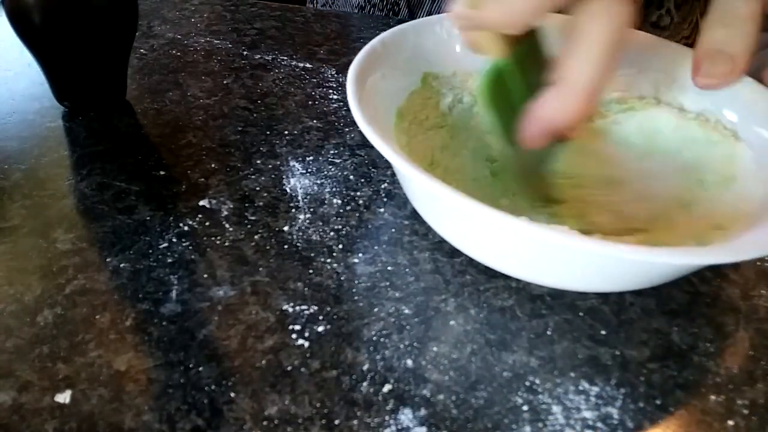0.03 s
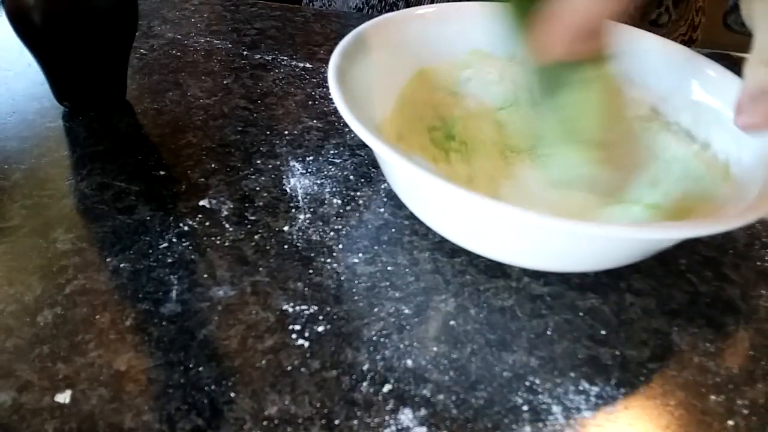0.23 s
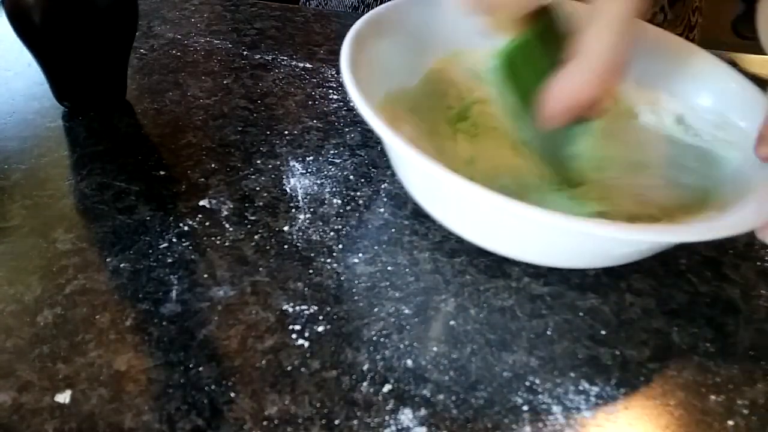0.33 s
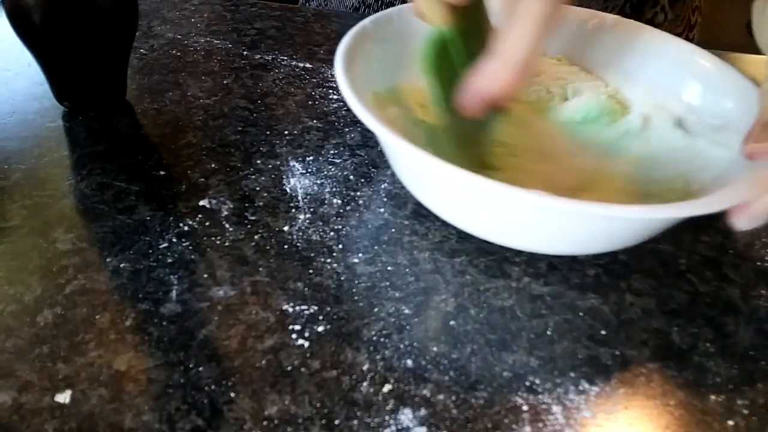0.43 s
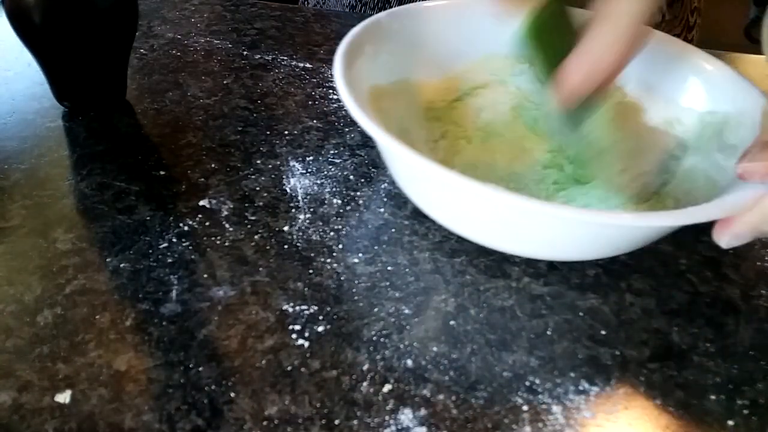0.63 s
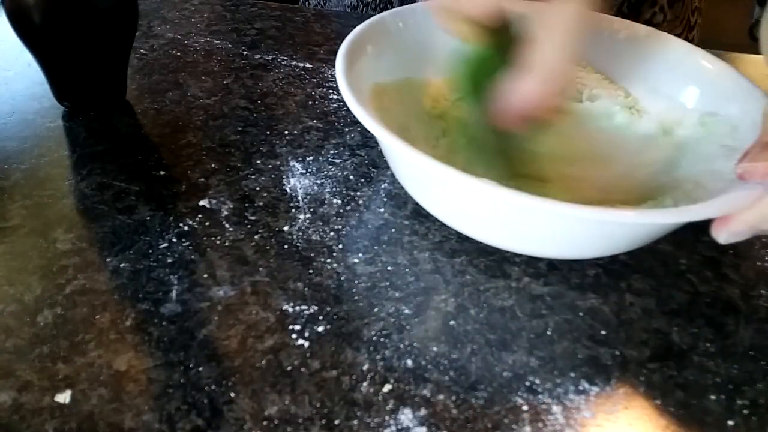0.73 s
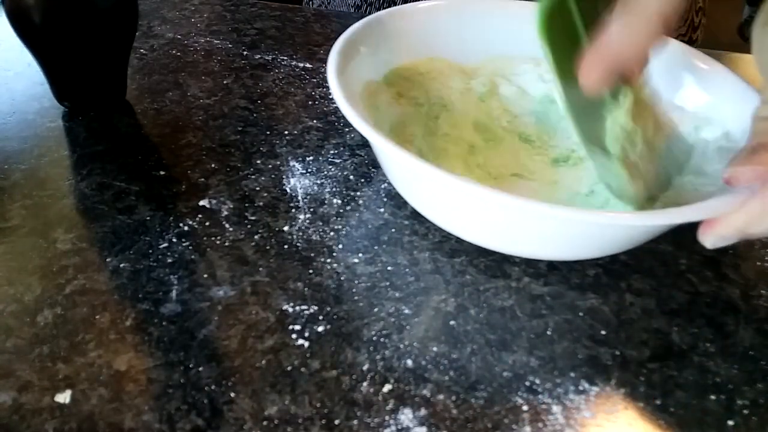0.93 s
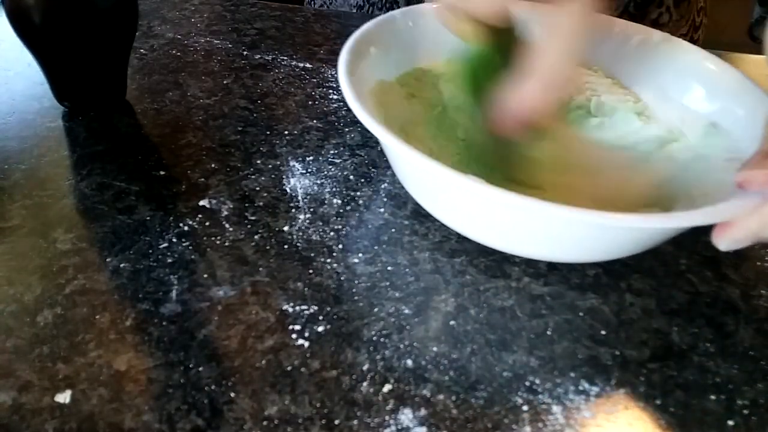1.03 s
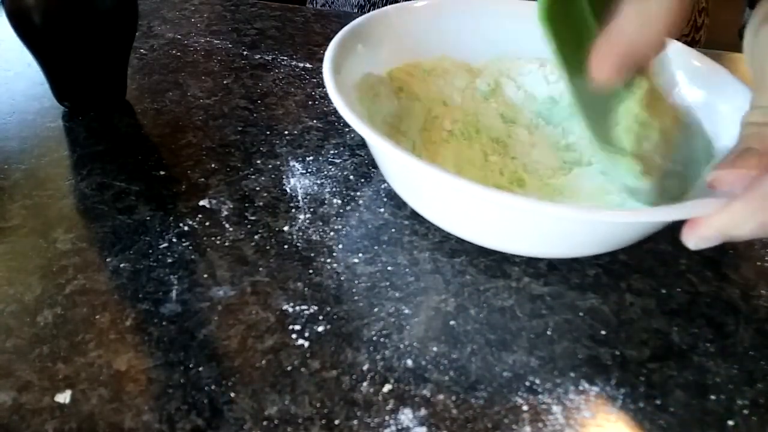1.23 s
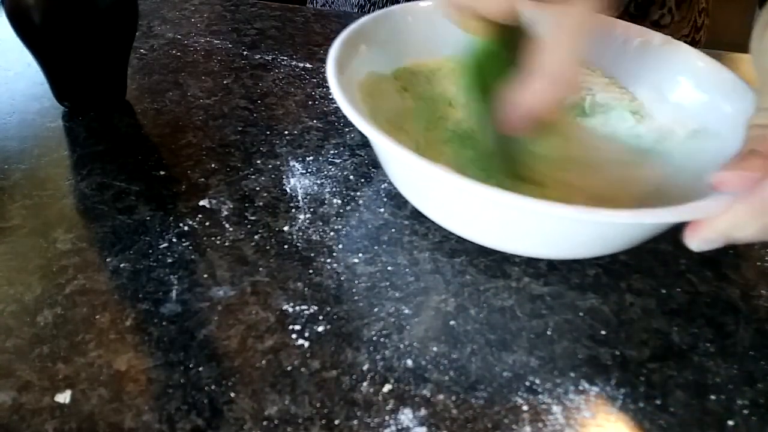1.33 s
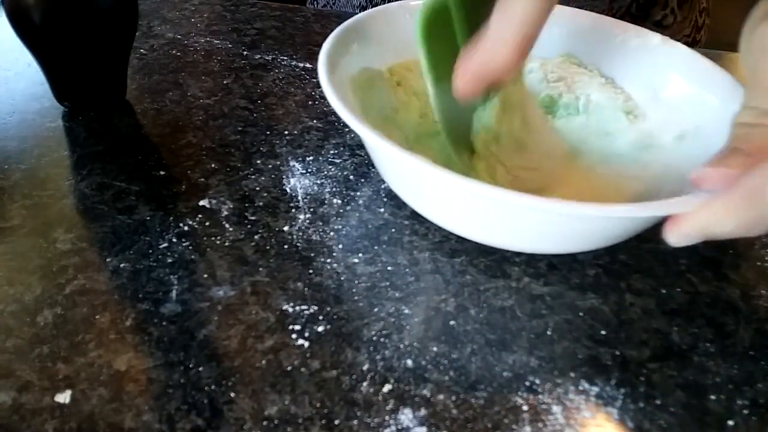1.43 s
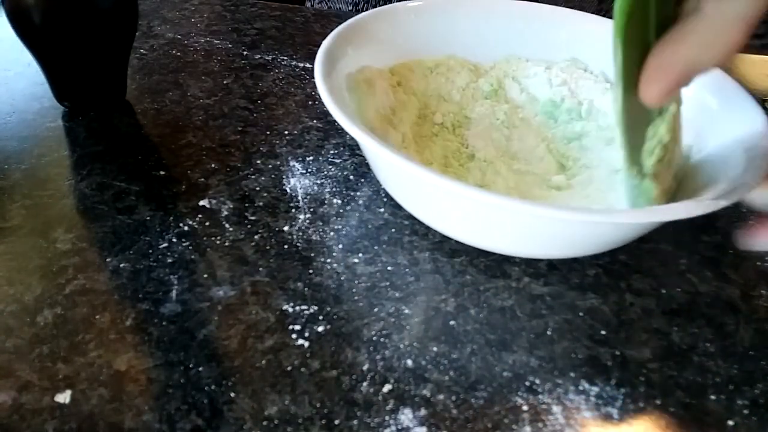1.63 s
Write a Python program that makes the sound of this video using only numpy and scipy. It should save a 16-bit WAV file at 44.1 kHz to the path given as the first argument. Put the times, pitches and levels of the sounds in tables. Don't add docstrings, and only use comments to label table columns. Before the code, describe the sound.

A soft spatula stirs damp gritty powder in a thick ceramic bowl, scraping, tapping and knocking

```python
import sys
import numpy as np
from scipy import signal
from scipy.fft import rfft, irfft
from scipy.io import wavfile

SR = 44100
rng = np.random.default_rng(int(sys.argv[2]) if len(sys.argv) > 2 else 0)


def put_to_file(sound):
    columns = np.atleast_2d(sound).T
    safe = np.clip(columns, -1, 1)
    whole_steps = np.round(safe * 32767)
    wavfile.write(sys.argv[1], SR, whole_steps.astype(np.int16))


def gain_from_decibels(decibels):
    exponent = np.asarray(decibels, float) / 20
    return 10 ** exponent


N = 74970

# peak time in seconds, grit level in dB,
# wall share in dB, width in seconds, brightness in dB.
CRUNCHES = [(.095, -58.5, 4, 0.0059, 27.5), (0.178, -47, 8, 0.014, 3), (.195, -39, 1.5, 0.0052, 0),
            (.219, -36.5, 12, 0.007, -10), (0.23, -31.5, 6, 0.0066, -21.5), (0.242, -39, 4.5, 0.0055, -15),
            (0.439, -45.5, 17.5, 0.015, 18.5), (0.449, -33.5, -6, 0.0045, -2), (0.516, -31, 0.5, 0.0042, 4),
            (0.532, -26, -8, 0.0071, 5), (.711, -58.5, 19, 0.005, 11), (0.843, -66.5, 26.5, 0.0079, -8),
            (1.079, -41, 9.5, 0.0095, -1), (1.088, -52, 1, 0.0017, 19), (1.114, -44, 3, 0.003, 3),
            (1.134, -59.5, 10, 0.0044, -7), (1.378, -46, 10, 0.0079, 12), (1.394, -35, 3.5, 0.0048, 7),
            (1.416, -41.5, 5, 0.0082, -1), (1.682, -50, 10.5, 0.014, 12)]
# start in seconds, grit peak in dB,
# wall share in dB, fade in seconds, brightness in dB.
TICKS = [(.205, -22.5, -11, 0.0047, -13), (.431, -27, -0.5, 0.0029, -8), (0.5308, -20.5, 0.5, .002, -4),
         (0.7852, -29, -2, 0.0085, -1), (0.96, -44, -12, 0.0064, 1), (1.0838, -33.5, -10, 0.004, 8),
         (1.097, -53, -9, .002, 10), (0.2294, -33, -15, 0.0027, -10), (.5132, -28, -17, .004, 5),
         (1.1129, -29, -17, 0.003, -5), (1.3901, -28, -10, 0.0026, -14), (1.3922, -40, -9, 0.0029, 4),
         (1.4125, -32, -12, .005, 3), (1.6774, -40, -4, 0.0045, 4), (0.3945, -40.5, -21, .003, 8)]
# pitch in Hz, level in dB, time to fade by 60 dB in seconds.
COUNTER_MODES = [(71, -6, 0.13), (82.16, -5, 0.35), (100, -3.5, 0.093), (138.6, -8, 0.1), (185, -1, 0.076),
                 (228, 4.5, 0.026), (277, -11, 0.26), (348, -20.5, 0.14)]
# pitch in Hz, level in dB,
# time to fade by 60 dB in seconds.
BOWL_MODES = [(381, -13, 0.06), (538, -0.5, 0.16), (567.3, 2, 0.063), (608.5, 0, 0.045), (687, 0.5, 0.035),
              (746.6, -0.5, 0.044), (803.5, -12.5, 0.091), (787, -18, 0.061), (830, -42, .04),
              (1390, -18, 0.05), (1733, -17, 0.11), (1826, -12, 0.017), (2530, -10.5, 0.01),
              (3340, -43, .04)]


def rms_one(x):
    return x / np.sqrt(np.mean(x ** 2) + 1e-20)


def colour(x, points):
    hz = np.fft.rfftfreq(N, 1 / SR) + 1
    at, db = np.transpose(points)
    return irfft(rfft(x) * gain_from_decibels(np.interp(np.log(hz), np.log(at), db)), N)


def drift(rate_hz):
    r = np.exp(-2 * np.pi * rate_hz / SR)
    wander = signal.lfilter([1], [1, -2 * r, r * r], rng.standard_normal(N + SR))
    return rms_one(wander[SR:])


def clicks(per_second, spread_db):
    size = gain_from_decibels(spread_db * np.minimum(rng.exponential(1, N), 4)) * rng.choice([-1, 1], N)
    return rms_one(size * (rng.random(N) < per_second / SR))


def ring(x, modes):
    out = 0
    for hz, db, t60 in modes:
        r, w = gain_from_decibels(-60 / (t60 * SR)), 2 * np.pi * hz / SR
        out = out + signal.lfilter([0, gain_from_decibels(db) * np.sin(w)], [1, -2 * r * np.cos(w), r * r], x + 1e-18)
    return out


def peak(x, hz, width_hz, db):
    a, w = gain_from_decibels(db / 2), 2 * np.pi * hz / SR
    k = np.tan(np.pi * width_hz / SR)
    middle = -2 * np.cos(w)
    return signal.lfilter([1 + k * a, middle, 1 - k * a], [1 + k / a, middle, 1 - k / a], x)


def high_pass(x, order, hz):
    return signal.sosfilt(signal.butter(order, hz, "high", fs=SR, output="sos"), x)


def band_pass(x, order, edges_hz):
    return signal.sosfilt(signal.butter(order, edges_hz, "band", fs=SR, output="sos"), x)


def hush():
    # pitch in Hz, level in dB.
    air_colour = [(24, -55), (40, -12), (109, 4), (230, -28), (520, 3.5), (990, -25), (5180, -24),
                  (9220, -36), (16000, -22)]
    level_db = -59
    air = colour(rng.standard_normal((2, N)), air_colour)
    return gain_from_decibels(level_db - 8.0) * air / np.std(high_pass(air, 4, 1000))


def efforts():
    # time in seconds, wall rumble in dB, rocking on the counter in dB.
    stroke = [(0, -57, -49), (.12, -48, -53.5), (.2, -35, -53), (0.332, -40, -45.5), (.4, -47.5, -46),
              (.5, -41.5, -48.5), (.6, -39.5, -33), (.69, -47, -48), (.8, -46.5, -48), (0.872, -43, -41),
              (0.949, -52.5, -60), (1.047, -79, -59), (1.098, -47, -38), (1.198, -43, -55.5),
              (1.3, -58.5, -64), (1.365, -62.5, -52), (1.478, -40, -49.5), (1.641, -59.5, -55.5)]
    # fastest moment in seconds, grit level in dB,
    # rise in seconds, fall in seconds, brightness in dB.
    sweeps = [(.06, -63, 0.2, 0.13, 10.5), (.15, -54, 0.049, 0.017, 6.5), (.34, -63, 0.064, 0.21, 19),
              (.66, -57, 0.14, 0.03, -12), (1.599, -61.5, 0.022, 0.17, 2), (0.214, -42.5, 0.037, 0.031, -1),
              (.265, -58, 0.048, 0.026, -20), (0.442, -44, 0.033, 0.04, 0),
              (0.556, -39.5, 0.042, 0.047, -6), (0.747, -50, 0.024, 0.033, 8.5),
              (0.873, -43.5, 0.038, 0.059, 3), (1.092, -45, 0.02, 0.047, -1),
              (1.195, -44.5, 0.039, .045, 2), (1.40, -50, 0.025, 0.065, 0), (1.498, -46.5, 0.032, .06, 0.5),
              (1.68, -52.5, .003, 0.083, 19)]
    tick_db = -9
    t = np.arange(N) / SR
    at, wall_db, rock_db = np.transpose(stroke)
    wall = gain_from_decibels(np.interp(t, at, wall_db)) ** 2
    rock = gain_from_decibels(np.interp(t, at, rock_db)) ** 2
    moves = []
    for s, db, rise, fall, tilt_db in sweeps:
        swell = np.exp(-((t - s) / np.where(t < s, rise, fall)) ** 2)
        moves.append((gain_from_decibels(db) * swell, tilt_db))
    for s, db, _, width, tilt_db in CRUNCHES:
        moves.append((gain_from_decibels(db) * np.exp(-((t - s) / width) ** 2), tilt_db))
    for s, db, _, fade, tilt_db in TICKS:
        moves.append((gain_from_decibels(db + tick_db) * (t > s) * np.exp(-np.abs(t - s) / fade), tilt_db))
    dull = sum((gain * gain_from_decibels(-tilt_db / 2)) ** 2 for gain, tilt_db in moves)
    bright = sum((gain * gain_from_decibels(tilt_db / 2)) ** 2 for gain, tilt_db in moves)
    return np.sqrt([dull, bright, wall, rock])


def grit(dull, bright):
    # pitch in Hz, level in dB.
    grain_colour = [(300, 2), (1000, 1.5), (2000, 0), (3200, -1.5), (4500, -3), (7000, -5.5), (11000, -9),
                    (16000, -12)]
    grains_per_s, grain_spread_db, patch_db = 4200, 6.5, 1.16
    band_edges_hz = [200, 1200, 2300, 3200, 4400, 5800, 7000, 8500, 11500, 17000]
    fineness = [.2, 0.053, .01, 0.35, 0.39, 0.83, 0.77, 1.0, 1.0]
    out = 0
    for low, high, fine in zip(band_edges_hz, band_edges_hz[1:], fineness):
        grains = colour(clicks(grains_per_s, grain_spread_db), grain_colour)
        patches = gain_from_decibels(patch_db * (drift(33.5) + drift(24)))
        band = band_pass(grains, 2, (low, high)) * patches
        out = out + band * dull ** (1 - fine) * bright ** fine
    return out


def rubbed(gain, modes):
    slips_per_s, slip_spread_db, slip_wander_db, contact_wander_db = 1500, 0.5, 2.5, 4
    slips = clicks(slips_per_s, slip_spread_db) * gain_from_decibels(slip_wander_db * drift(34))
    out = 0
    for mode in modes:
        contact = gain_from_decibels(contact_wander_db * np.clip(drift(13.9), -2, 2))
        out = out + ring(gain * slips * contact, [mode])
    return out / np.std(ring(slips, modes)) * gain_from_decibels(-2)


def jolts():
    jolt_db, jolt_hz, chatter_hz, chatter_jitter = 3, 1183, 638, 0.14
    push, bump = np.zeros(N), np.hanning(int(SR / jolt_hz) + 2)
    jitter = rng.normal(0, chatter_jitter, (len(CRUNCHES), 11))
    steps = (jitter + np.arange(-5, 6)) / chatter_hz
    for (s, db, wall_db, width, _), late in zip(CRUNCHES, steps):
        strength = np.exp(-(late / (0.63 * width)) ** 2)
        push[((s + late) * SR).astype(int)] += gain_from_decibels(db + wall_db + jolt_db) * strength
    for s, db, wall_db, *_ in TICKS:
        push[int(s * SR)] += gain_from_decibels(db + wall_db + 0.5)
    return ring(np.convolve(push, bump / bump.sum())[:N], BOWL_MODES) / 3


def knocks():
    # start in seconds, peak in dB, contact sharpness in Hz, share of the deep boom in dB.
    knock_rows = [(0.099, -43.5, 154, 17.5), (0.224, -25, 410, -23), (0.392, -28, 443, -25),
                  (0.402, -34, 295, -19), (0.5308, -11, 470, 7.5), (0.539, -10, 185, -11),
                  (0.577, -24, 192, -13), (.635, -40, 148, 23.5), (.735, -25, 328, 0),
                  (0.7453, -26.5, 328, 4.5), (1.074, -29.5, 405, 5), (1.19, -34.5, 200, 5),
                  (1.372, -27.5, 308, 10.5), (1.4027, -22.5, 262, 2), (1.4076, -21.5, 493, 7),
                  (1.504, -29, 204, 8.5), (1.678, -28, 377, 7.5)]
    deep_hz, wall_db = 110, -2
    push, deep = np.zeros(N), np.zeros(N)
    for s, db, hz, deep_db in knock_rows:
        bump = np.hanning(int(SR / hz) + 2)
        bump = bump / bump.sum()
        i = int(s * SR)
        push[i:i + len(bump)] += bump * gain_from_decibels(db - 6.5)
        deep[i:i + len(bump)] += bump * gain_from_decibels(db - 12 + deep_db)
    boom = ring(deep, [m for m in COUNTER_MODES if m[0] < deep_hz])
    thud = ring(push, [m for m in COUNTER_MODES if m[0] > deep_hz])
    return boom + thud + gain_from_decibels(wall_db) * ring(push, BOWL_MODES)


def raps():
    # start in seconds, peak in dB, pitch in Hz, time to fade by 60 dB in seconds.
    rap_rows = [(.176, -37, 516, .03), (.1955, -25, 714, 0.023), (0.2054, -25, 592, 0.041),
                (.2215, -19.5, 601, 0.031), (0.2299, -17.5, 640, 0.024), (.299, -28.5, 570, 0.036),
                (.356, -36.5, 545, 0.048), (.3935, -39.5, 614, 0.028), (.433, -31, 616, 0.036),
                (.5135, -23, 680, .03), (.5312, -16.5, 830, 0.021), (0.5331, -8, 635, 0.015),
                (.557, -30.5, 514, 0.036), (.837, -36, 550, .03), (.851, -34.5, 648, 0.044),
                (1.0755, -26, 630, 0.018), (1.0795, -20.5, 722, 0.02), (1.111, -27.5, 600, 0.03),
                (1.133, -32, 540, 0.049), (1.152, -34, 544, 0.04), (1.389, -31, 760, 0.022),
                (1.4097, -22, 560, .014), (.936, -42.5, 565, .05), (1.0722, -30, 694, 0.0081),
                (0.2246, -28, 577, 0.047), (1.502, -33.5, 562, 0.068), (1.52, -36.5, 550, 0.036),
                (1.677, -28.5, 583, 0.0093), (1.686, -33, 645, 0.047)]
    # multiple of the pitch, level in dB.
    overtones = [(1.3, -7), (2.1, -16)]
    out = np.zeros(N)
    for s, db, hz, t60 in rap_rows:
        push = np.zeros(SR // 8)
        push[:9] = np.hanning(9) / 4
        tones = [(hz, db, t60)]
        tones += [(hz * k, db + over_db, t60 / k) for k, over_db in overtones]
        note = ring(push, tones)
        i = int(s * SR)
        out[i:i + len(note)] += note[:N - i]
    return out


def cracks():
    crack_db, low_hz = 9, 900
    s, db = np.transpose(TICKS)[:2]
    push = np.zeros(N)
    push[(s * SR).astype(int)] = gain_from_decibels(db + crack_db)
    return high_pass(push, 2, low_hz)


def squeaks():
    # peak time in seconds, level in dB, pitch in Hz, width in seconds.
    squeak_rows = [(.208, -41, 2800, 0.0033), (0.255, -51, 2700, 0.0096), (.264, -49, 2500, 0.0045),
                   (0.289, -54.5, 2640, 0.011), (.535, -38, 1800, 0.0065), (1.086, -48, 8000, 0.0033),
                   (1.084, -45.5, 10960, 0.0081), (1.099, -47, 11100, 0.0025), (1.392, -33, 6530, 0.0048),
                   (1.393, -37.5, 10740, 0.0043), (1.6, -46.5, 1510, 0.0041), (1.113, -50, 1390, 0.0033),
                   (1.415, -42.5, 3730, 0.0034), (.865, -53.5, 2700, .012), (1.414, -44, 6600, 0.0024),
                   (1.69, -50, 1470, .01)]
    cycles = 24
    t, rub = np.arange(N) / SR, rng.standard_normal(N)
    out = 0
    for s, db, hz, width in squeak_rows:
        tone = rms_one(ring(rub, [(hz, 0, cycles / hz)]))
        out = out + gain_from_decibels(db) * np.exp(-((t - s) / width) ** 2) * tone
    return out


def space(x, near_db):
    right_lag_s, near_fade_s, near_low_hz = .00002, 0.0011, 638
    room_t60_s, room_db, room_band_hz = 0.43, -12.5, [350, 15000]
    t = np.arange(SR // 2) / SR
    near = rng.standard_normal((2, len(t))) * np.exp(-t / near_fade_s)
    near = high_pass(near, 2, near_low_hz)
    tail = rng.standard_normal((2, len(t))) * gain_from_decibels(-60 * t / room_t60_s) * (t > .006)
    tail = band_pass(tail, 1, room_band_hz)
    reply = 0
    for db, echo in [(near_db, near), (room_db, tail)]:
        reply = reply + gain_from_decibels(db) * echo / np.sqrt(np.sum(echo ** 2, axis=1, keepdims=True))
    direct = np.array([x, np.interp(np.arange(N) - right_lag_s * SR, np.arange(N), x)])
    return direct + signal.fftconvolve(x[None], reply, axes=1)[:, :N]


def scene():
    spots, grit_echo_db, body_echo_db, wall_rub_db = 3, 3.5, -4.5, 2
    dull, bright, on_wall, on_counter = efforts()
    powder = sum(space(grit(dull, bright), grit_echo_db) for _ in range(spots)) / np.sqrt(spots)
    rub = gain_from_decibels(wall_rub_db) * rubbed(on_wall, BOWL_MODES) + rubbed(on_counter, COUNTER_MODES)
    body = space(rub + jolts() + knocks() + raps(), body_echo_db)
    glaze = space(cracks(), grit_echo_db) + space(squeaks(), grit_echo_db)
    return hush() + powder + body + glaze


def roll_off(x):
    return signal.sosfilt(signal.butter(12, 16660, fs=SR, output="sos"), x)


def record(dry):
    # pitch in Hz, width in Hz, level in dB.
    left_port = [(443, 86, -5), (7600, 1940, 8.5), (6070, 330, 5.5), (9480, 710, -18.5), (12750, 6700, -8)]
    right_port = [(435, 52, -11), (6800, 850, -1.5), (6610, 86, 6), (9100, 460, -3), (10280, 660, 6),
                  (11950, 5700, 1.5)]
    turn_hz, turn_width_hz = 4310, 2570
    low_cut_hz, top_hz = 52.2, 16050
    ports = []
    for x, port in zip(dry, [left_port, right_port]):
        for hz, width_hz, db in port:
            x = peak(x, hz, width_hz, db)
        ports.append(x)
    left, right = ports
    k = np.tan(np.pi * turn_width_hz / SR)
    turn = [1 + k, -2 * np.cos(2 * np.pi * turn_hz / SR), 1 - k]
    right = signal.lfilter(turn[::-1], turn, right)
    left = np.concatenate([np.zeros(6), left[:-6]])
    mix = high_pass(np.array([left, right]), 7, low_cut_hz)
    mix = signal.sosfilt(signal.cheby2(16, 50, top_hz, fs=SR, output="sos"), mix)
    return roll_off(mix)


dry = scene()
out = record(dry)
put_to_file(out)
```